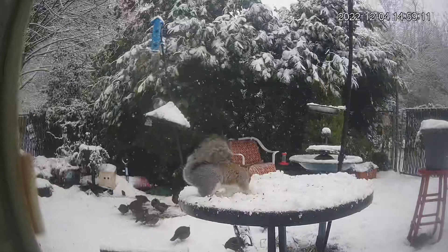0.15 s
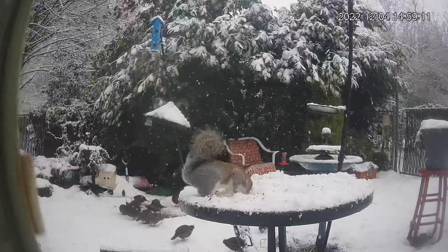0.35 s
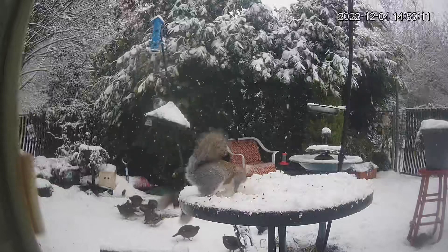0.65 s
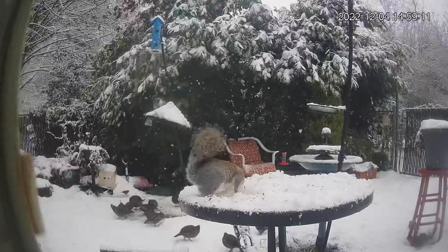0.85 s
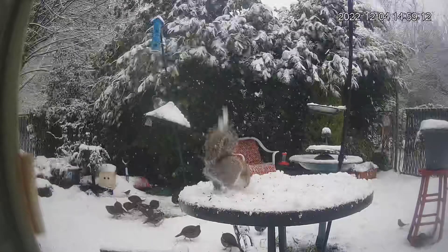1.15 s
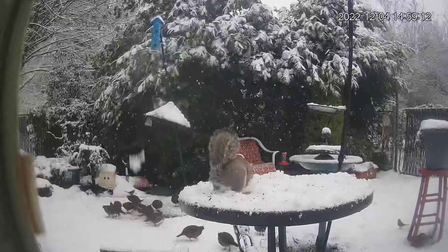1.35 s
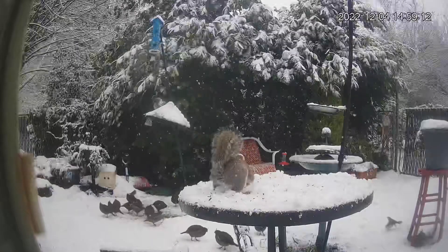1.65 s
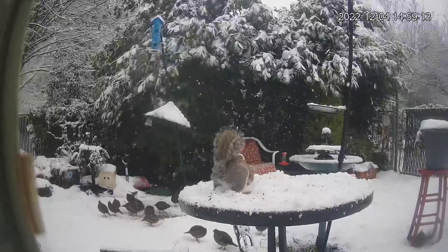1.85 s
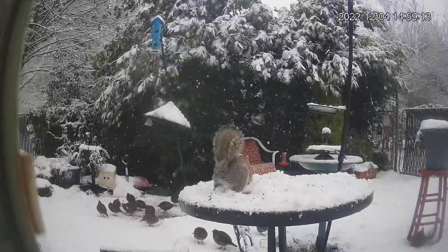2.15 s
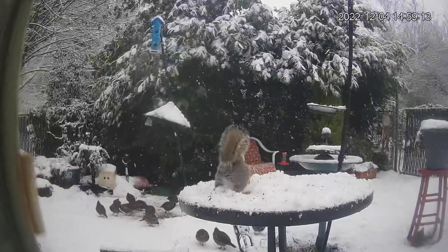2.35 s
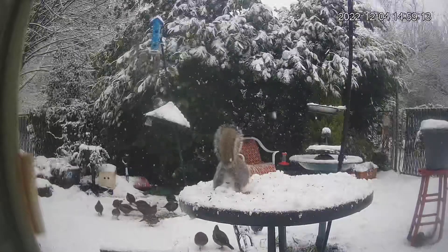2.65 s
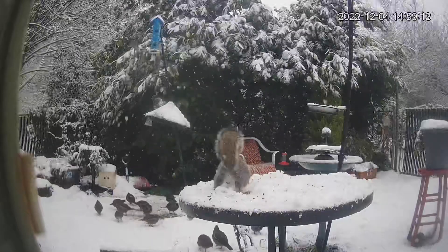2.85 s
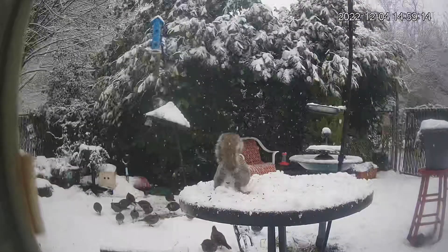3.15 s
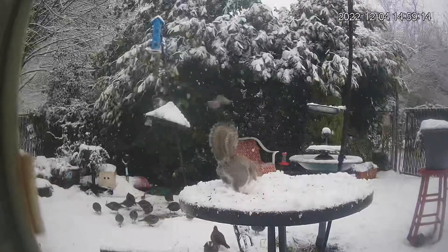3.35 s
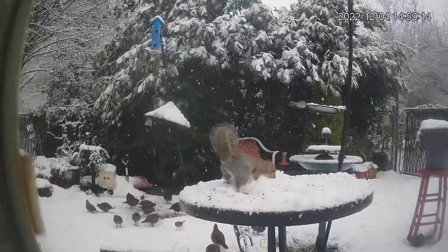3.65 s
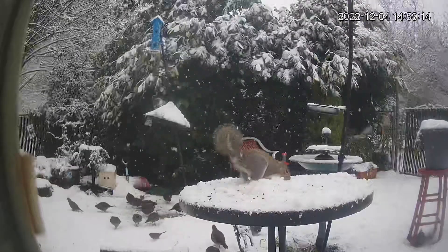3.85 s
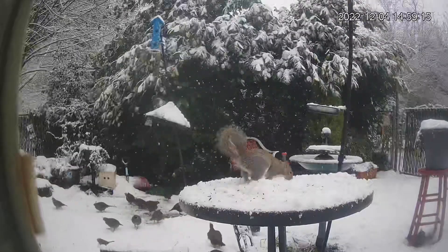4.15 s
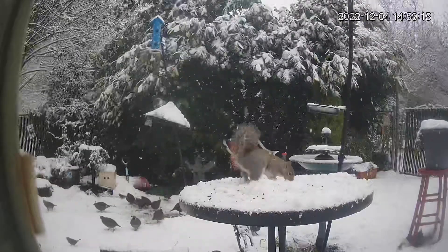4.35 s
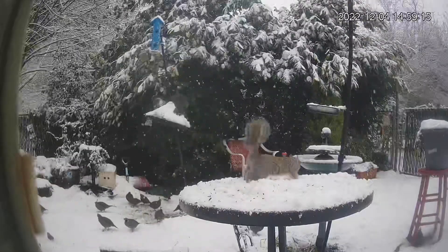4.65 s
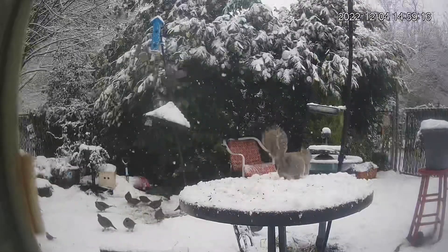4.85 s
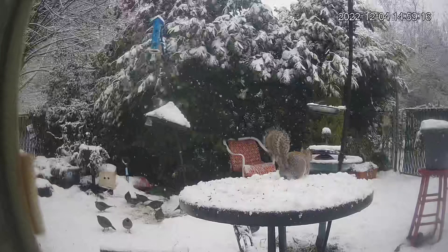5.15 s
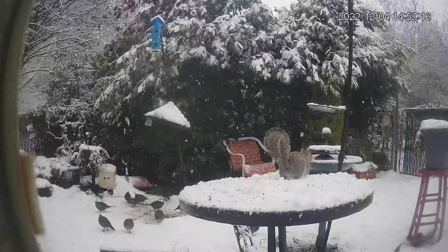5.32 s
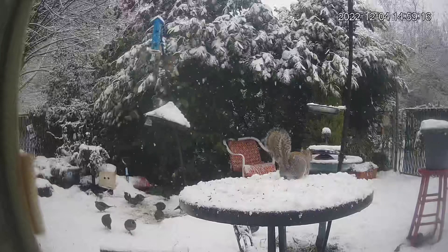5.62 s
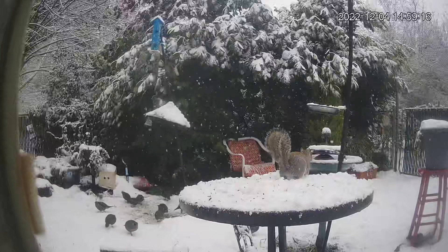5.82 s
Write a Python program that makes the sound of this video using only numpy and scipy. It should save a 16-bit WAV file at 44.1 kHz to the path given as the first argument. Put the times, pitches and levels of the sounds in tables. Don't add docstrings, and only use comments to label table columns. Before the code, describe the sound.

A snowy yard heard through a modest outdoor camera, with short echo, limited treble and gritty scraps of hiss. From 0 to 1.9 seconds, small ground birds give tiny two-toned pips around 4 kHz and hoarse rising chirps, several each second. From about 1 second a vehicle drones behind the fence, low and buzzing, climbing in pitch, strongest near 2.5, surging again around 4 and fading by 5. Soft downward slurs come at 2.2, 2.3 and 2.8, with a small dry tick at 2.7. Between 2.6 and 3.2 a closer bird makes five bright, pointed up-and-down calls. Calls then pause until 4.1, when a clear high whistle drops quickly and holds, slightly sagging, until 4.4. Soft, rapid wing puffs flutter from 4.3 to 4.7, with feathery rustle. Afterward only a faint trailing whistle, a few weak calls and tiny ticks remain over near-silent hush until 6.

```python
import sys
import numpy as np
from scipy import signal
from scipy.fft import rfft, irfft
from scipy.io import wavfile
from scipy.ndimage import uniform_filter1d, minimum_filter1d

SR = 44100
rng = np.random.default_rng(int(sys.argv[2]) if len(sys.argv) > 2 else 0)


def transcribe(u):
    v = np.clip(np.atleast_2d(u).T, -1, 1)
    q = np.round(v * 32767).astype(np.int16)
    wavfile.write(sys.argv[1], SR, q)


def undo_db(level):
    steps = np.asarray(level, float) / 20
    return 10 ** steps


N = 263718

# (start [t/s], length [t/s], top [f/Hz], sweep [level/dB], lower octave at the crest [level/dB])
CHIRPS = [(0.449, 0.064, 6920, -39, -58), (0.665, 0.078, 6770, -31, -23),
          (0.828, 0.065, 6760, -28.5, -37.5), (1.032, .09, 6800, -33.5, -28),
          (1.19, .095, 6810, -31, -20.5), (1.36, 0.08, 6796, -35, -26), (1.548, 0.1, 6810, -33, -20.5),
          (1.762, 0.073, 6845, -35.5, -21.5)]
CHIRP_CREST = .65


def level(x):
    return x / np.sqrt(np.mean(np.abs(x) ** 2))


def band(hz, width_hz):
    bell = np.exp(-.5 * ((np.fft.rfftfreq(N, 1 / SR) - hz) / width_hz) ** 2)
    return level(irfft(rfft(rng.standard_normal(N)) * bell, N))


def coloured(points):
    hz, db = np.transpose(points)
    gain = undo_db(np.interp(np.log(np.fft.rfftfreq(N, 1 / SR) + 1), np.log(hz), db))
    return level(irfft(rfft(rng.standard_normal(N)) * gain, N))


def envelope(s, db):
    return undo_db(np.interp(np.arange(N) / SR, s, db, left=-150, right=-150))


def quaver(rough, rate_hz):
    rough = np.clip(rough, 0, 1)
    wander = band(0, rate_hz) + 1j * band(0, rate_hz)
    return np.sqrt(1 - rough) + np.sqrt(rough / 2) * wander


def add(out, start_s, sound):
    i = int(start_s * SR)
    out[i:i + len(sound)] += sound[:N - i]


def glide(table):
    return [(s, d, hz - up / 2, hz, hz + up / 2, db) for s, d, hz, up, db in table]


def notes(table, rough, rate_hz, flat, half_db, crest=None, throat_hz=4500, width_hz=np.inf, aside_db=-150,
          bend=1, half_rough=1):
    tone, under = np.zeros(N, complex), np.zeros(N, complex)
    for start, length, first, middle, last, db, *lean_db in table:
        u = np.arange(int(length * SR)) / int(length * SR)
        if crest:
            rise = np.interp(u, [0, crest, 1], [0, 1, (last - first) / (middle - first)])
            rise = np.where(u < crest, np.abs(rise) ** bend, rise)
            hz = uniform_filter1d(first + (middle - first) * rise, size=400, mode="nearest")
        else:
            hz = 2 * first * (u - .5) * (u - 1) + 4 * middle * u * (1 - u) + 2 * last * u * (u - .5)
        phase = 2 * np.pi * np.cumsum(hz) / SR
        swell = np.tanh(flat * np.sin(np.pi * u) ** 2) / np.tanh(flat)
        size = undo_db(db + 2 * sum(lean_db) * (u - .5)) * swell
        throat = np.exp(-.5 * ((hz - throat_hz) / width_hz) ** 2) + undo_db(aside_db)
        add(tone, start, size * throat * np.exp(1j * phase))
        add(under, start, size * np.exp(.5j * phase))
    return (tone * quaver(rough, rate_hz) + undo_db(half_db) * under * quaver(half_rough, 120)).imag


def yard(x, wet_db):
    t60_s, gap_s = 0.16, 0.0016
    u = np.arange(int(.4 * SR)) / SR
    echo = rng.standard_normal(len(u)) * np.exp(-np.log(1000) * u / t60_s) * (u > gap_s)
    return x + undo_db(wet_db) * signal.fftconvolve(x, echo / np.sqrt(np.sum(echo ** 2)))[:N]


def air():
    # (f/Hz, level/dB)
    hush_colour = [(18, -54.5), (30, -34), (113, -0.5), (538, -12), (999, -27.5), (1690, -21.5),
                   (1900, -21.5), (7170, -24), (9320, -45.5), (15800, -120)]
    return undo_db(-63) * coloured(hush_colour)


def vehicle():
    # (t/s, firing rate [f/Hz], nearness [level/dB], throttle [level/dB])
    drive = [(.12, 90, -68.5, 13), (0.498, 90, -71.5, -10), (0.679, 85.23, -57.5, -0.5),
             (0.972, 84.6, -70.5, -0.5), (1.08, 87.17, -54, 7.5), (1.299, 96.38, -49.5, 10),
             (1.982, 118.4, -42.5, 5.5), (2.501, 128, -38, -1), (2.902, 129.7, -42, -13),
             (3.03, 126.9, -44, 9.5), (3.349, 126.4, -49, 15), (3.698, 109.6, -51.5, 6.5),
             (4.05, 108.7, -41.5, 8.5), (4.452, 110.8, -46, 8.5), (4.702, 108.5, -49.5, -13),
             (5.07, 107.7, -55.5, 3.5), (5.2, 110, -67.5, 0), (5.901, 112.3, -71, 11)]
    # (multiple of firing rate, level/dB)
    orders = [(0.25, -32), (0.5, -22), (0.75, -15), (1, 1.5), (1.25, -12), (1.5, -14.5), (1.75, -22),
              (2, -16.5), (2.25, -24), (2.5, -30)]
    # (f/Hz, level/dB)
    rumble_colour = [(12, -54), (20, -20), (37, -21), (119, -7), (231, -12), (320, -27.5), (420, -58),
                     (700, -120)]
    tyre_colour = [(250, -30), (330, 0), (600, -6), (900, -16), (2000, -30), (4000, -60)]
    tyre_db, tyre_share = -46, 0.37

    s, *columns = np.transpose(drive)
    hz, near_db, throttle_db = (np.interp(np.arange(N) / SR, s, c) for c in columns)
    turns = 2 * np.pi * np.cumsum(hz) / SR
    engine = sum(undo_db(db) * (np.exp(1j * k * turns) * quaver(.15, 7)).imag for k, db in orders)
    rumble = coloured(rumble_colour) * undo_db(2.5 * band(0, 14))
    tyres = coloured(tyre_colour) * undo_db(3 * band(0, 10))
    return (undo_db(near_db + throttle_db + 3.5) * engine + undo_db(near_db + 3.5) * rumble
            + undo_db(tyre_db + tyre_share * near_db) * tyres)


def ticks():
    # (t/s, peak [level/dB], colour [f/Hz])
    pecks = [(1.2774, -41, 3230), (2.1695, -48.5, 1940), (2.686, -31, 3390), (3.3677, -52, 3730),
             (3.4142, -58, 1220), (4.3171, -47.5, 3800), (5.34, -51.5, 1000), (5.5907, -50, 2010)]
    out, u = np.zeros(N), np.arange(int(.04 * SR)) / SR
    for start, db, hz in pecks:
        add(out, start, undo_db(db) * np.exp(-u / 0.0048) * band(hz, 1500)[:len(u)])
    return out


def wings():
    # (t/s, peak [level/dB], pitch [f/Hz])
    beats = [(4.286, -37, 323), (4.337, -32, 453), (4.388, -35.5, 553), (4.434, -35.5, 407),
             (4.488, -32, 535), (4.538, -34.5, 469), (4.595, -43, 473), (4.647, -43, 416),
             (4.696, -36, 413), (4.824, -73, 348.7)]
    # (t/s, level/dB)
    rustle = [(4.42, -75.5), (4.6, -64), (4.74, -58.5), (4.8, -89)]
    low_cap_db = -68.5

    puffs, u = np.zeros(N), np.arange(int(.06 * SR)) / SR
    push = u / 0.0052 * np.exp(1 - u / 0.0038)
    for start, db, hz in beats:
        puff = np.sin(2 * np.pi * hz * u) + 0.3 * band(505, 154)[:len(u)]
        add(puffs, start, push * undo_db(db) * puff)
    s, high_db = np.transpose(rustle)
    high = envelope(s, high_db) * (band(4600, 570) + 0.31 * band(3400, 200))
    low = envelope(s, np.minimum(high_db, low_cap_db)) * band(1479, 450)
    return puffs + undo_db(2 * band(0, 25)) * (high + low)


def dip():
    # (start [t/s], length [t/s], first [f/Hz], lowest [f/Hz], last [f/Hz], level/dB)
    dip_note = (6, 0, 6250, 5520, 6251, -42)
    return notes([dip_note], rough=.05, rate_hz=60, flat=1.2, half_db=-60)


def slurs():
    # (start [t/s], length [t/s], pitch [f/Hz], glide [f/Hz], level/dB)
    coos = [(0.17, 0.081, 608.5, 11, -51), (0.279, 0.055, 4760, -75, -53.5), (.859, .075, 585, 56.5, -50.5),
            (1.363, 0.031, 410, -70, -47), (2.006, 0.15, 4174, -60.5, -63.5), (2.144, 0.056, 552, 49, -48),
            (2.664, 0.087, 6150, -1450, -32), (2.71, .055, 5250, -300, -32),
            (5.901, 0.068, 6900, 104, -63.5)]
    # (start [t/s], hold [t/s], settled pitch [f/Hz], level/dB, upper voice [level/dB])
    falls = [(2.158, 0.038, 5330, -31.5, -7), (2.311, 0.052, 5810, -31, -20.5), (2.8, 0.046, 5620, -32, -4)]
    drop_hz, lead_s, lead_db, sag_hz, upper_hz = 880, 0.028, -12.5, 81.5, 705

    rows = glide(coos)
    for s, hold, low_hz, low_db, upper_db in falls:
        for hz, db in ((low_hz, low_db), (low_hz + upper_hz, low_db + upper_db)):
            rows += [(s, 2 * lead_s, hz + drop_hz, hz + .3 * drop_hz, hz, db + lead_db),
                     (s + lead_s, hold, hz + sag_hz, hz, hz - sag_hz, db)]
    return notes(rows, rough=0.043, rate_hz=16, flat=8.1, half_db=-52.5)


def chirps():
    # (start [t/s], length [t/s], pitch [f/Hz], glide [f/Hz], level/dB)
    near_calls = [(.038, 0.041, 2650, 1314.5, -53), (.09, 0.027, 3900, 886.5, -38.5),
                  (.314, 0.063, 2453, -200, -58.5), (.363, 0.051, 6450, -300, -51.5),
                  (.52, .04, 2900, 690, -50.5), (.62, 0.065, 4000, -150, -36.5),
                  (2.296, 0.024, 4130, 1155, -39.5), (2.448, 0.018, 3900, 1107, -37.5),
                  (2.5, .022, 6510, 99.5, -45), (3.013, 0.045, 5314, -400, -28.5),
                  (3.148, .027, 5070, 1055, -31)]
    far_calls = [(.1, .051, 6800, 602, -64), (.335, 0.043, 5060, 467, -50.5), (.55, 0.18, 6040, -600, -62),
                 (.73, 0.041, 5180, 896.5, -46), (.99, 0.049, 4760, 199.5, -41),
                 (1.262, .016, 6410, -100, -42), (1.455, .041, 4700, 898, -42),
                 (2.145, 0.046, 2020, 150, -60.5), (2.26, 0.011, 3500, 791, -56),
                 (2.51, 0.024, 2910, -250, -46), (2.55, 0.022, 4210, 603, -63),
                 (2.66, .038, 2900, -400, -45.5), (3.05, 0.034, 2742, -200, -43.5),
                 (3.17, .058, 3200, 358, -36), (3.25, .023, 4960, -1400, -47),
                 (4.385, 0.019, 4305, -300, -30), (4.83, 0.036, 4970, 298, -58),
                 (4.84, 0.045, 3090, 103, -51), (4.859, .027, 3507, 45, -48.5),
                 (5.212, 0.033, 3070, 332, -46.5), (5.232, 0.0362, 3240, -100, -38.5)]
    foot_hz, end_hz = 3900, 5330
    rows = [(s, d, foot_hz, top, end_hz, db, -4.0) for s, d, top, db, _ in CHIRPS]
    sweeps = notes(rows, rough=0.78, rate_hz=240, flat=3.2, half_db=-36.5, crest=CHIRP_CREST,
                   throat_hz=4240, width_hz=610, aside_db=-9, bend=1.4)
    near = notes(glide(near_calls), rough=0.3, rate_hz=460, flat=2.9, half_db=-28.0)
    far = notes(glide(far_calls), rough=0.94, rate_hz=170, flat=24, half_db=-36.5)
    return sweeps + near + far


def pips():
    # (start [t/s], length [t/s], upper
    # pitch [f/Hz], upper [level/dB], lower [level/dB])
    pairs = [(0.0, .024, 4380, -29.5, -36), (0.076, 0.027, 4000, -44.5, -28.5),
             (0.185, 0.019, 4120, -30.5, -37), (0.344, 0.019, 4127, -28.5, -32),
             (0.468, 0.018, 4045, -27.5, -32.5), (0.549, .028, 3996, -74, -33),
             (.62, 0.023, 4086, -30.5, -29), (0.747, 0.021, 4100, -19.5, -23),
             (.765, 0.012, 3925, -27, -32.5), (0.862, 0.01, 3987, -16.5, -15.5),
             (0.866, 0.024, 4146, -39.5, -24), (1.01, .02, 4123, -28, -21.5),
             (1.027, 0.021, 4070, -25, -21.5), (1.23, 0.022, 4220, -24, -20.5),
             (1.485, 0.011, 4126, -32.5, -22.5), (1.494, 0.026, 4060, -27.5, -28),
             (2.758, 0.038, 4120, -53.5, -37), (2.881, 0.018, 4130, -51.5, -34.5),
             (3.013, 0.015, 4167, -56, -33.5)]
    # (start [t/s], length [t/s], top [f/Hz], upper [level/dB], lower [level/dB])
    hooks = [(.108, .044, 4503, -27, -34.5), (2.47, .043, 4344, -22.5, -29.5)]
    lower_voice, undertone = .83, .705
    undertone_db, undertone_lag_s, hook_lower_lag_s = -17, .008, 0.0063
    crest_s, crest_lead_s = .022, .015

    rows = [(s + CHIRP_CREST * d - crest_lead_s, crest_s, top / 2, db) for s, d, top, _, db in CHIRPS]
    rows += [(s + undertone_lag_s, 1.3 * d, undertone / lower_voice * hz, db + undertone_db - 4)
             for s, d, hz, db in rows]
    for s, d, hz, db, low_db in pairs:
        rows += [(s, d, hz, db), (s, d, lower_voice * hz, low_db),
                 (s + undertone_lag_s, d, undertone * hz, low_db + undertone_db)]
    rows = [(s, d, 0.94 * hz, hz, 0.94 * hz, db) for s, d, hz, db in rows]
    for s, d, top, db, low_db in hooks:
        for t, hz, voice_db in ((s, top, db), (s + hook_lower_lag_s, lower_voice * top, low_db)):
            rows.append((t, d, 0.94 * hz, hz, .84 * hz, voice_db))
    return notes(rows, rough=0.0057, rate_hz=510, flat=2.9, half_db=-66.0)


def whistle():
    # (t/s, level/dB)
    effort = [(3.541, -71.5), (3.8, -54.5), (4.029, -47), (4.061, -50), (4.11, -19), (4.36, -21),
              (4.391, -38.5), (4.47, -61), (4.62, -70.5)]
    high_hz, low_hz, sag_hz_per_s = 5995, 4330, 200
    drop_s, settle_s = 4.064, 0.038
    droop_hz, droop_s = 140.3, 0.06
    hold_hz, hold_arch_hz, hold_db, faint_db = 3900, 49, -56.5, -22
    start_s, attack_s, sustain_s, release_s = 4.57, .045, 0.37, 0.21

    tone, time = np.zeros(N, complex), np.arange(N) / SR
    after = np.maximum(time - drop_s, 0)
    fall = low_hz - sag_hz_per_s * np.minimum(after, .4)
    fall = fall + (high_hz - low_hz) * np.exp(-after / settle_s)
    fall = fall - droop_hz * np.exp(-np.abs(time - drop_s) / droop_s)
    hold = hold_hz + hold_arch_hz * np.sin(np.pi * (time - start_s) / (sustain_s + release_s))
    held = (np.cumsum([start_s, attack_s, sustain_s, release_s]), hold_db + faint_db * np.array([1, 0, 0, 1]))
    for (s, db), hz in ((np.transpose(effort), fall), (held, hold)):
        size = envelope(s, db + 9)
        wobble = .002 * band(0, 16) + 0.0073 * band(0, 5) / (1 + size / undo_db(-35))
        pitch = uniform_filter1d(hz, size=300) * (1 + wobble)
        tone += uniform_filter1d(size, size=200) * np.exp(2j * np.pi * np.cumsum(pitch) / SR)
    rough = 0.058 + 0.37 / (1 + np.abs(tone) / undo_db(-29.5))
    return (tone * quaver(rough, 45) * quaver(0.00028, 450)).imag


def arches():
    # (start [t/s], length [t/s], top [f/Hz], level/dB, fall louder than rise [level/dB])
    calls = [(2.642, 0.063, 5904, -25.5, 10), (2.76, 0.06, 5050, -18, 1), (2.899, 0.055, 5270, -17, 1),
             (3.014, .074, 5720, -17, 2.5), (3.162, 0.063, 6670, -16.5, 0)]
    foot_hz, end_hz = 3400, 3463
    rows = [(s, d, foot_hz, top, end_hz, db, lean_db) for s, d, top, db, lean_db in calls]
    return notes(rows, rough=0.068, rate_hz=290, flat=12, half_db=-26, crest=0.65, throat_hz=4700,
                 width_hz=500, aside_db=-17.5, bend=1.0, half_rough=0.74)


def scene():
    flock = yard(pips(), wet_db=-9) + yard(chirps() + wings(), wet_db=-4) + yard(slurs(), wet_db=-6)
    near = yard(arches(), wet_db=-13.5) + yard(ticks(), wet_db=-14.5)
    return (flock + near + whistle() + vehicle() + air() + dip())[None]


def top_cut(x):
    return signal.sosfilt(signal.butter(12, 7320, fs=SR, output="sos"), x)


def record(dry):
    over_db, doubt_db, depth_db, mask_db = 4.5, 8, -15, -25
    ajar_db, leak_db, smear_db = -51, -0.5, -0.5

    frames = signal.stft(dry[0], nperseg=1408)[2][:256]
    power = np.abs(frames.reshape(32, 8, -1)) ** 2
    patch = np.mean(power, axis=1)
    doubt = undo_db(2 * doubt_db * np.clip(rng.standard_normal(patch.shape), -2, 1))
    hush = np.percentile(patch[:, -22:], 40, axis=1)[:, None]
    gain = np.clip(1 - undo_db(2 * over_db) * doubt * hush / patch, undo_db(depth_db), 1)
    loudest = -minimum_filter1d(-uniform_filter1d(patch, size=3, axis=0), size=7, axis=1)
    masking = 1 + (undo_db(2 * mask_db) * loudest * np.sqrt(doubt) / patch) ** 3
    gain[8:] /= masking[8:]
    ajar = 1 / (1 + undo_db(2 * ajar_db) / patch[8:].max(axis=0))
    leak = undo_db(2 * leak_db) * hush * ajar / doubt
    typical = np.exp(np.mean(np.log(power + 1e-20), axis=1))
    smear = undo_db(2 * smear_db) * typical * gain ** 2 + leak
    smear[:5] = 0
    grit = rng.standard_normal(frames.shape) + 1j * rng.standard_normal(frames.shape)
    frames = frames * np.repeat(gain, 8, axis=0) + np.repeat(np.sqrt(smear / 2), 8, axis=0) * grit
    clean = signal.istft(np.pad(frames, ((0, 705 - 256), (0, 0))), nperseg=1408)[1][None, :N]
    return top_cut(clean)


dry = scene()
out = record(dry)
transcribe(out)
```